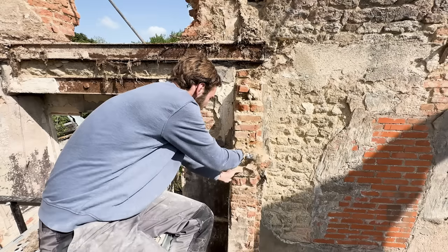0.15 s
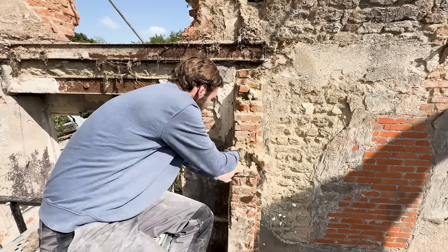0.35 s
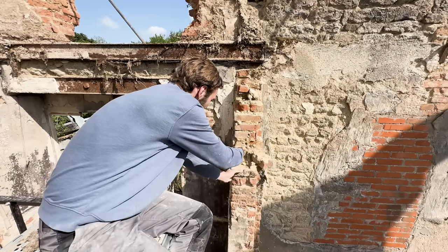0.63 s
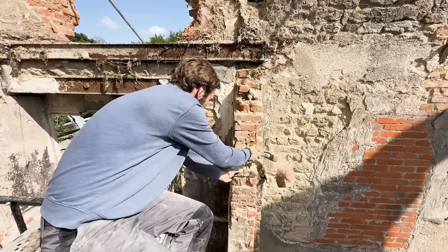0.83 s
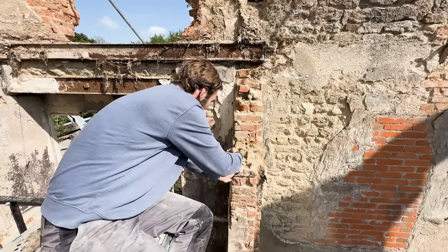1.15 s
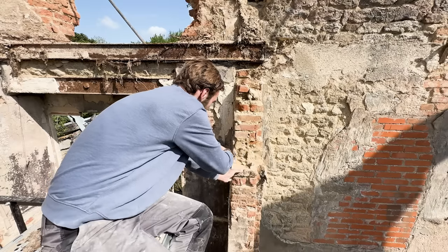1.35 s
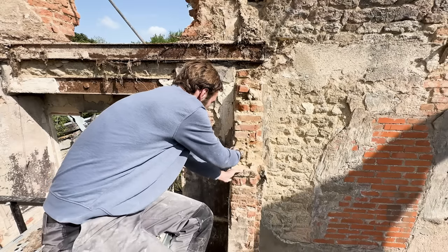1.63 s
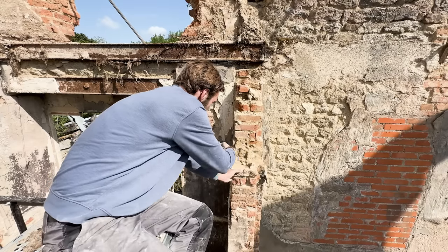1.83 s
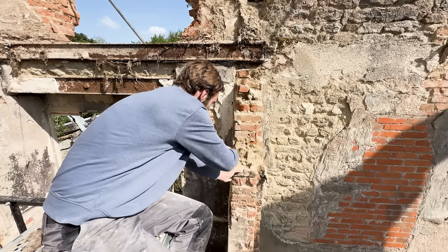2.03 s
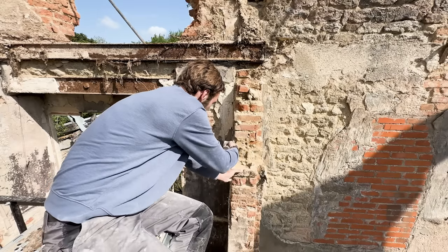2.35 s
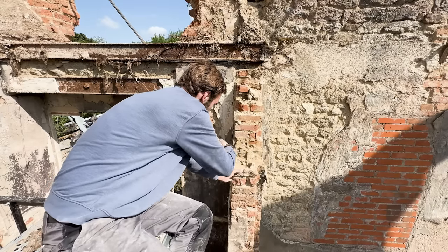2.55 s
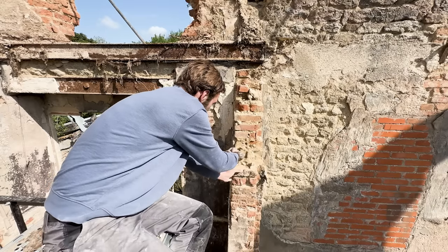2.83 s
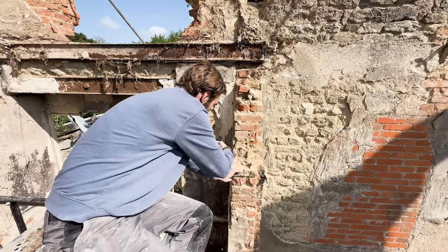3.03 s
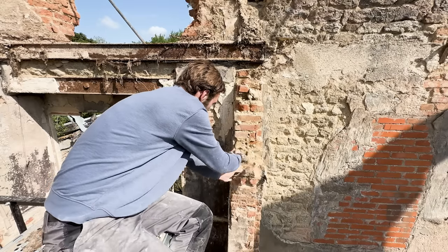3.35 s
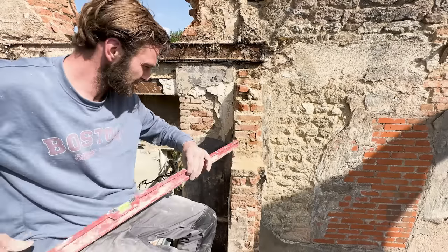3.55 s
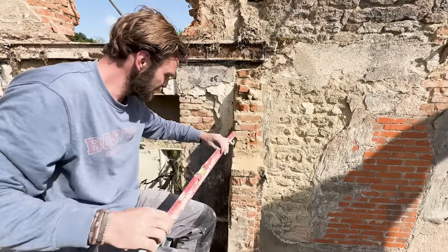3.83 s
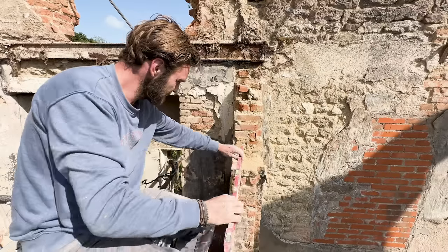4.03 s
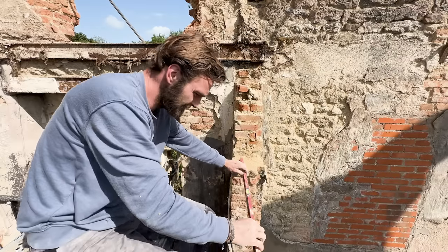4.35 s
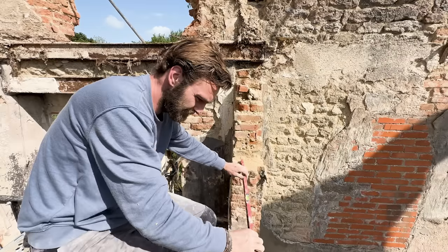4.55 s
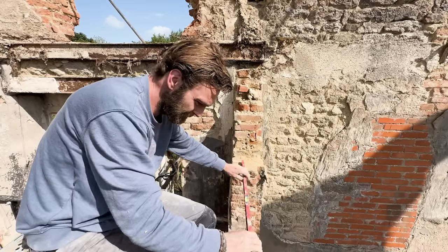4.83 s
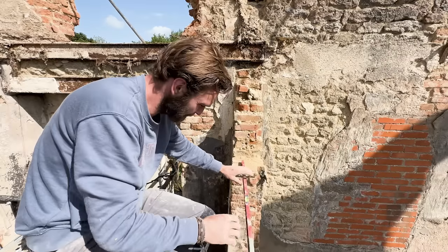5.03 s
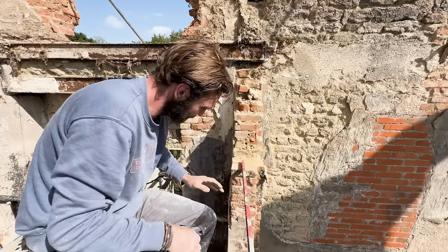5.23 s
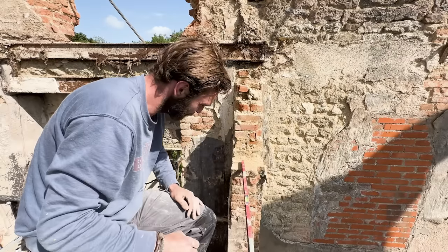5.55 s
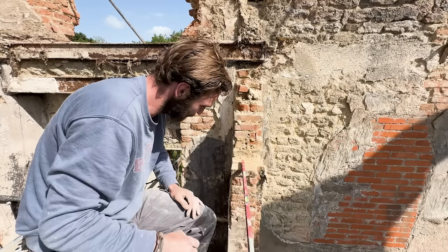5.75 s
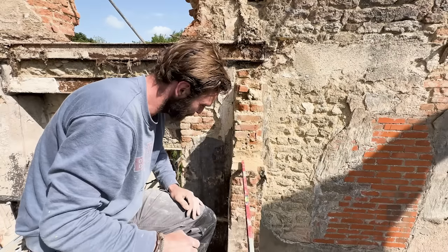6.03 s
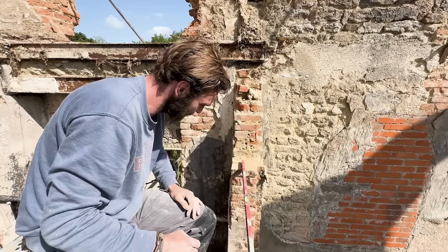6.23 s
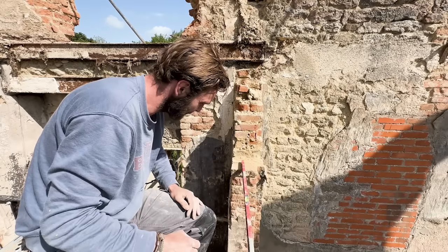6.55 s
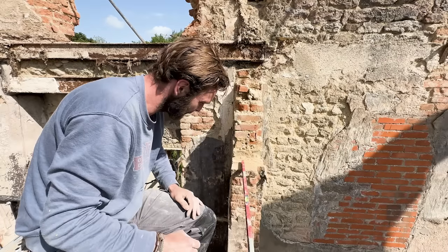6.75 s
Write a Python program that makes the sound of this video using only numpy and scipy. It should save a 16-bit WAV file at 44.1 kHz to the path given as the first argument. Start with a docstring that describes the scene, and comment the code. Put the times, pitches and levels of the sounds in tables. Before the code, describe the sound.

Loose brick and mortar crash down close by in an open ruin, thinning to small knocks, soft metallic scrapes, then near silence with distant birds.

```python
"""A quiet open ruin, heard through two microphone ports so close that the treble arrives in opposite phase.
At once, near by, masonry is knocked off an old wall: lumps boom on boards, bricks crumble, chips clatter
and grit trickles after, all made of shaped noise and resonances, with a short echo from the walls.
From about 3.5 s rubble shifts underfoot and a long metal tool, ringing modes shaken by rasps, is leaned
on the wall. After 6 s far birds whistle and coo in wavering sines; filtered noise is the air throughout."""
import sys
import numpy as np
from scipy import signal
from scipy.fft import rfft, irfft, next_fast_len
from scipy.io import wavfile
from scipy.ndimage import uniform_filter1d, map_coordinates

SR = 44100
rng = np.random.default_rng(int(sys.argv[2]) if len(sys.argv) > 2 else 0)


def waveform_to_disk(signal):
    """Save audio, clipped to [-1, 1], as 16-bit WAV at the path in sys.argv[1]."""
    frames = np.transpose(np.atleast_2d(signal))
    scaled = np.clip(frames, -1, 1) * 32767
    samples = np.round(scaled).astype(np.int16)
    wavfile.write(sys.argv[1], SR, samples)


N = 303830

# Far air at the ports. Each row: frequency in Hz, relative level in dB.
AIR_COLOUR = [(20, -30.5), (45, 3), (120, 2), (260, -9), (420, -14), (800, -22.5), (1500, -31.5),
              (2000, -26), (3000, -32), (5000, -36.5), (6200, -23), (8000, -44), (11000, -62.5),
              (16200, -57)]
AIR_DB = -63.5  # level before it is shared out over the ports
# How alike the far air is at the two ports. Each row: frequency in Hz, likeness from -1 to 1.
AIR_LIKENESS = [(60, -0.97), (300, 0.39), (700, -0.52), (3000, 0.56), (6800, 1), (15000, -1)]
# How alike the near sounds are at the two ports. Each row: frequency in Hz, likeness from -1 to 1.
NEAR_LIKENESS = [(60, 0.97), (180, 1), (350, 0.97), (600, 0.43), (1200, 0.736), (3000, 0.63), (6000, 0.67),
                 (9000, 0.74), (11000, 1), (14000, 1), (16000, .9)]
# Phase between the ports for near sounds. Each row: frequency in Hz, lead of the left in radians.
NEAR_LEAD = [(250, 0), (600, .6), (1200, .1), (4000, .3), (6000, -.6), (8000, -1.8), (10000, -2.5),
             (11000, -3.02), (13800, -3.3), (15300, -4.1)]
# Balance of the ports. Each row: frequency in Hz, left minus right in dB.
PORT_BALANCE = [(200, 0), (700, 3), (1300, .5), (2400, 2), (4400, 1), (8000, 0)]

# Showers of falling rubble. Each row: start in seconds, rise in seconds, fall in dB/s,
# then the peaks of lumps, chunks, chips and grit in dB; the shares below scale rise and fall.
SHOWERS = [(0.0, 0.00067, 170.5, -7.5, -22, -28, -30.5), (0.03, 0.039, 246.5, -42, -28, -27.5, -34.5),
           (0.17, 0.0048, 92, -30, -38, -36.5, -54), (0.386, 0.012, 122.5, -16.5, -21.5, -23, -38),
           (0.46, 0.038, 112.5, -19.5, -20.5, -28.5, -38.5),
           (0.704, 0.0052, 400.5, -27, -31.5, -28.5, -35.5), (0.762, 0.039, 103, -6.5, -14, -25, -50.5),
           (0.97, 0.11, 104, -27, -33, -37.5, -45), (1.3, 0.11, 28, -43.5, -54, -56, -59.5),
           (1.561, 0.0026, 158, -38, -40.5, -36, -47.5), (1.71, 0.089, 97.5, -46, -52, -52, -54),
           (1.82, 0.033, 140, -32.5, -28.5, -24, -46), (2.075, 0.03, 185, -39, -36.5, -39.5, -52),
           (2.125, 0.029, 349.5, -32.5, -33, -33, -46.5), (2.2, 0.018, 94.5, -33.5, -37, -36.5, -42.5),
           (2.33, 0.019, 157, -49, -46.5, -72, -50), (2.44, 0.1, 203, -54.5, -51.5, -54.5, -61),
           (2.734, 0.0028, 896, -30, -42.5, -33, -66.5), (2.745, 0.0097, 162, -42, -55, -75, -62),
           (2.826, 0.012, 185, -41, -36, -61, -75.5), (3.042, 0.013, 150.5, -50, -52, -88.5, -100),
           (3.293, 0.0024, 903, -35, -43.5, -41.5, -63), (3.3, 0.013, 209, -32.5, -58, -73, -102)]
# Loose rubble shifted underfoot, nothing trickling after. Each row: as for the showers.
SHUFFLES = [(3.48, 0.012, 148.6, -48.5, -56, -62, -50.5), (3.56, 0.113, 58.4, -62, -81, -69, -56),
            (3.715, 0.031, 130.4, -78, -49, -54.5, -45), (3.79, 0.018, 150, -66, -67, -71, -52.5),
            (3.86, 0.023, 93, -55, -60, -62, -55), (3.95, 0.086, 60.2, -86.5, -85, -76, -63.5),
            (4.31, 0.07, 40, -61, -65.5, -72, -68), (4.5, 0.04, 49.6, -58, -59.5, -64.5, -61.5),
            (4.72, 0.061, 130, -50, -60.5, -72, -62.5), (5.066, 0.0036, 123, -66.5, -65.5, -80, -94),
            (5.222, 0.022, 43, -67, -80, -81, -63.5), (5.28, 0.068, 200.3, -59, -59, -61, -53),
            (5.497, 0.0083, 102.6, -58.5, -63, -79, -99)]
RISE_DB = 9.5  # a shower starts this far under its peak
# Share of the row's rise time. In order: lumps, chunks, chips, grit.
RISE_SHARE = [1, 0.69, 0.83, 1.05]
# Share of the row's fall rate. In order: lumps, chunks, chips, grit.
FALL_SHARE = [0.88, 0.92, 1, 1]
# Stragglers after a shower, in dB relative to its peak. In order: lumps, chunks, chips, grit.
TRICKLE_DB = [-28, -24, -27, -15.5]
# Fall of the stragglers, in dB/s. In order: lumps, chunks, chips, grit.
TRICKLE_FALL = [43, 31, 37, 11]
# Resonances of the boards. Each row: frequency in Hz, width in Hz, relative level in dB.
BOARDS = [(47.8, 60, -14), (64.5, 9.9, 0.5), (109, 35, -4.5), (150.5, 41, -2.5), (205, 64, -5),
          (296, 74, -7)]
# Colour of knocking chunks. Each row: frequency in Hz, relative level in dB.
CHUNK_COLOUR = [(130, -39), (260, -2), (350, -1), (520, -2.5), (750, -9.5), (1100, -28), (2200, -41.5),
                (5000, -100)]
# Colour of clattering chips. Each row: frequency in Hz, relative level in dB.
CHIP_COLOUR = [(350, -35), (650, 1), (950, -2.5), (1500, -6), (2300, -10), (3500, -18.5), (6000, -47),
               (12000, -90.5)]
# Colour of hissing grit and of cracks. Each row: frequency in Hz, relative level in dB.
GRIT_COLOUR = [(1290, -14.5), (2200, -8), (3020, -9), (3980, -9.5), (5030, -10.5), (9030, -12),
               (10700, -14.5), (14700, -21), (16200, -17.5)]
# Scatter of colour among the pieces. Each row: frequency in Hz, depth in dB.
PIECE_SCATTER = [(400, 3), (2000, 3.5), (8000, 3)]

# Pieces heavy enough to thump the boards. Each row: time in seconds, crack in dB, thump in dB,
# thump in Hz, knock in dB, knock in Hz; levels are relative within each kind.
HITS = [(0.0014, -31, -1, 80.3, -36.5, 604), (0.1835, -33, -21, 100.7, -24.5, 815),
        (0.389, -25.5, -8.5, 98.6, -15, 351.9), (0.446, -45, -6.5, 112, -28.5, 299.7),
        (0.4807, -27, -12, 144.8, -13, 329.6), (0.7051, -13.5, -29.5, 165.2, -43, 437.8),
        (0.715, -23, -27.5, 167, -34.5, 480), (0.7658, -31, -3.5, 135.2, -7.5, 367.2),
        (0.7973, -30.5, -4, 73.55, -16.5, 331.6), (0.878, -51, -8.5, 172.7, -22.5, 344.2),
        (0.928, -49, -17.5, 85, -30.5, 297), (1.563, -23, -41, 147, -28.5, 577),
        (1.579, -47, -29.5, 90.6, -56, 450), (1.8357, -28, -28.5, 93.45, -35.5, 1790),
        (1.8466, -36.5, -32.5, 132, -12, 1000), (2.1005, -37.5, -16.5, 198.5, -30.5, 478),
        (2.15, -22.5, -22, 165, -28.5, 820), (2.208, -34.5, -26, 130.6, -39.5, 690),
        (2.3399, -33, -25.5, 108.3, -37.5, 481), (2.376, -50.5, -29.5, 79, -45, 450),
        (2.462, -34.5, -32.5, 76, -56.5, 562), (2.7353, -25.5, -34, 199, -23.5, 1260),
        (2.744, -48.5, -27, 91.8, -47, 455), (2.9527, -38, -36.5, 78.9, -68, 440),
        (2.9895, -35.5, -37, 59.2, -44, 1560), (3.295, -23.5, -24.5, 225, -32.5, 1370),
        (3.306, -46.5, -26, 84.9, -42.5, 450), (3.3604, -38.5, -30, 88.6, -73, 431),
        (3.742, -47.5, -45, 192, -43, 565), (3.8837, -42.5, -34, 210, -41.5, 444),
        (4.58, -38, -37, 245, -48.5, 590), (4.794, -40.5, -35.5, 134.7, -47, 578),
        (5.587, -75, -56, 90.2, -61, 303)]
# Light taps of chips and tool on brick. Each row: time in seconds, crack in dB, knock in dB, knock in Hz;
# levels are relative within each kind.
TAPS = [(0.3915, -30, -24, 1480), (1.217, -30.5, -37, 990), (1.3752, -49.5, -39.5, 2350),
        (2.113, -44, -20.5, 473), (2.1354, -27.5, -27, 450), (2.4999, -58, -35, 556),
        (2.7635, -32, -50, 452), (2.841, -65, -39, 554), (3.068, -65, -43.5, 520),
        (3.1533, -45.5, -54, 490), (3.4873, -47, -45, 1764), (3.556, -62.5, -52, 4800),
        (3.581, -63, -46, 8400), (3.594, -47, -55, 8000), (3.675, -34, -43.5, 1700),
        (3.7172, -47, -41, 1800), (3.7223, -36, -36.5, 3700), (3.728, -36, -40, 3340),
        (3.7353, -40, -48, 1500), (3.8115, -35, -43, 2800), (3.8669, -49.5, -40, 1500),
        (3.870, -50, -39, 1970), (3.9625, -40.5, -50.5, 1770), (4.044, -42, -64, 1930),
        (4.117, -44.5, -73, 2274), (4.373, -42.5, -65.5, 550), (4.4053, -70, -57, 857),
        (4.431, -64.5, -51, 1240), (4.518, -48.5, -53.5, 1120), (4.732, -40.5, -77, 456),
        (4.773, -54, -56, 1750), (5.067, -70.5, -57, 545), (5.227, -55, -60.5, 2490),
        (5.3213, -38.5, -50.5, 643), (5.432, -44, -61, 2500), (5.526, -70.5, -53, 600),
        (6.7664, -58, -67, 1693)]
TAP_THUMP_DB, TAP_THUMP_HZ = -14.5, 141.7  # the boards' answer, set relative to the tap's knock entry

# Echo of the standing walls. Each row: frequency in Hz, time to fall 60 dB in seconds.
WALLS = [(100, 0.09), (1000, 0.19), (10000, 0.11)]

# Brick and mortar crumbling. Each row: start in seconds, rise in seconds, fall in dB/s,
# peak in dB, centre in Hz.
SHATTERS = [(0.386, 0.02, 59, -31.5, 1510), (1.812, 0.03, 116.5, -21, 1178), (1.82, 0.045, 198, -26.5, 530),
            (2.07, 0.048, 217.5, -28.5, 526), (3.733, 0.008, 300, -42, 567),
            (3.734, 0.0095, 600, -46.5, 1511), (5.492, 0.0093, 126, -62.5, 781)]

# Resonances of the long metal tool. Each row: frequency in Hz, width in Hz, relative level in dB.
TOOL_MODES = [(268.4, 51, 11.5), (672, 17, 5), (836, 22, 6.5), (924, 21, 8), (1540, 50, 3), (1815, 40, -1),
              (2480, 45, 4), (3070, 80, 5), (3590, 90, -1), (4840, 80, -1), (6150, 200, -3),
              (8700, 450, 3.5), (10500, 300, 2)]
# The tool drags on brick. Each row: start in seconds, stop in seconds, level in dB,
# centre of the rasp in Hz, its sharpness Q.
DRAGS = [(3.462, 3.486, -39, 4300, .35), (3.515, 3.54, -59, 3050, 4), (4.335, 4.4, -68, 930, 8),
         (4.4, 4.445, -63, 840, 8), (4.445, 4.535, -71, 930, 6), (4.54, 4.585, -63, 930, 6),
         (4.58, 4.71, -67, 675, 7), (4.5, 4.63, -74, 1815, 8), (4.578, 4.658, -58, 260, 1),
         (4.715, 4.79, -56.5, 277, 2), (4.76, 4.81, -63, 930, 6), (5.323, 5.356, -53.5, 2465, .5)]

# Small far birds. Each row: start in seconds, length in seconds, pitch in Hz, glide in Hz/s,
# level in dB before fade, flicker and balance.
CHIRPS = [(6.09, 0.32, 4070, -100, -68), (6.57, .11, 7450, 300, -85), (6.775, 0.1, 7780, 1200, -87)]
CHIRP_ATTACK_S, CHIRP_FADE_DB_PER_S, CHIRP_SCOOP_HZ = 0.03, 65, 200
COO_S, COO_LENGTH_S, COO_HZ, COO_LAST_HZ = 6.22, .21, 650, 530
COO_DB = -74.5  # before flicker and balance
COO_SWELL_DB, COO_HOLD_SHARE, COO_RELEASE_DB_PER_S = 5, .35, 320
TOP_HZ = 16100  # band limit


def amp(db):
    """Decibels to gain."""
    return 10 ** (np.asarray(db) / 20)


def unit(x):
    """Scaled to rms 1."""
    return x / np.sqrt(np.mean(x ** 2) + 1e-20)


def along(points, hz):
    """(Hz, value) points read on a log frequency axis."""
    f, v = np.transpose(points)
    return np.interp(np.log(hz + 1), np.log(f + 1), v)


def filtered(x, response):
    """x times a complex response of frequency."""
    m = next_fast_len(x.shape[-1] + SR // 2)
    spectrum = rfft(x, m) * response(np.fft.rfftfreq(m, 1 / SR))
    return irfft(spectrum, m)[..., :x.shape[-1]]


def patchy(pair, depth, window, bins, frames):
    """A random gain field over time and frequency, its depth in (Hz, dB) points."""
    hz, _, z = signal.stft(pair, SR, nperseg=window)
    field = uniform_filter1d(rng.standard_normal(z.shape[1:]), bins, 0)
    field = uniform_filter1d(field, frames, 1)
    gain = amp(along(depth, hz)[:, None] * unit(field))
    gain = gain / np.sqrt(np.mean(gain ** 2, 1, keepdims=True))
    return signal.istft(z * gain, SR, nperseg=window)[1][:, :N]


def ports(pair, alike, lead):
    """Two unrelated signals shared out over the microphone ports with the given likeness and phase lead."""
    def shares(hz):
        turn = np.arccos(np.clip(along(alike, hz), -1, 1)) / 2
        return np.array([np.cos(turn), np.sin(turn)])

    def left_and_right(hz):
        half = amp(along(PORT_BALANCE, hz) / 2) * np.exp(.5j * along(lead, hz))
        return np.array([half, 1 / half])

    common, opposed = filtered(pair, shares)
    return filtered(np.array([common + opposed, common - opposed]), left_and_right)


def air():
    """Far countryside hum and hiss: noise in uneven patches, deepest in the bass."""
    noise = rng.standard_normal((2, N))
    pair = patchy(noise, [(100, 4), (600, 3), (3000, 2)], window=2048, bins=3, frames=3)
    pair = unit(filtered(pair, lambda hz: amp(along(AIR_COLOUR, hz))))
    return amp(AIR_DB) * ports(pair, AIR_LIKENESS, [(60, 0)])


def contacts(db, rate, scatter_db, smooth):
    """Many small contacts of uneven size, rate per second, over a share of smooth noise."""
    n = len(db)
    struck = rng.random(n) < rate / SR
    grains = struck * amp(scatter_db * rng.standard_normal(n)) * rng.standard_normal((2, n))
    return amp(db) * unit(unit(grains) + smooth * rng.standard_normal((2, n)))


def resonant(pair, modes, contact):
    """Through a sum of resonances, of which the contact excites only a part; total energy 1."""
    def response(f):
        h = sum((-1) ** k * amp(db) * 1j * f * width / (centre ** 2 - f * f + 1j * f * width)
                for k, (centre, width, db) in enumerate(modes))
        excited = h * contact(f)
        return unit(np.abs(excited)) * np.exp(1j * np.angle(excited))
    return filtered(pair, response)


def coloured(pair, spectrum, size=8192):
    """Through a causal impulse response of energy 1 with this colour."""
    gain = amp(along(spectrum, np.fft.rfftfreq(size, 1 / SR)))
    # folding the cepstrum forward gives minimum phase: no sound before its cause
    cepstrum = irfft(np.log(gain + 1e-6))
    cepstrum[1:size // 2] *= 2
    cepstrum[size // 2 + 1:] = 0
    h = irfft(np.exp(rfft(cepstrum)))
    return signal.fftconvolve(pair, h[None] / np.linalg.norm(h), axes=1)[:, :N]


def loose_levels(size=16):
    """Level in dB of lumps, chunks, chips and grit: showers rise and fall, then stragglers trickle."""
    rate = SR / size
    column = lambda v: np.array(v)[:, None]
    power = np.full((4, N // size + 1), 1e-12)
    for rows, trickles in ((SHOWERS, True), (SHUFFLES, False)):
        for s, rise, fall, *peak_db in rows:
            at = round(s * rate)
            rise_s = rise * column(RISE_SHARE)
            after = np.arange(power.shape[1] - at) / rate - rise_s  # seconds since the peak
            late = np.clip(after, 0, None)
            rising_db = column(peak_db) + RISE_DB * np.clip(after, None, 0) / rise_s
            # twice the dB turns gain into power
            tail = amp(-2 * fall * column(FALL_SHARE) * late)
            stragglers = amp(2 * (column(TRICKLE_DB) - column(TRICKLE_FALL) * late))
            power[:, at:] += amp(2 * rising_db) * (tail + trickles * stragglers)
    return np.repeat(10 * np.log10(power), size, axis=1)[:, :N]


def rubble():
    """Lumps boom on the boards, chunks knock, chips clatter and grit hisses, all as dense small contacts."""
    lumps_db, chunks_db, chips_db, grit_db = loose_levels()
    soft = lambda hz: 1 / (1 + 1j * hz / 350) ** 3  # heavy lumps land softly

    def pieces(db, rate):
        # every piece rings at its own pitches for a moment, so the colour of the shower keeps changing
        steady = contacts(0 * db, rate, scatter_db=4, smooth=1.0)
        return patchy(steady, PIECE_SCATTER, window=512, bins=2, frames=3) * amp(db)

    lumps = resonant(contacts(lumps_db, rate=100, scatter_db=1.5, smooth=2.0), BOARDS, soft)
    chunks = coloured(pieces(chunks_db, rate=220), CHUNK_COLOUR)
    chips = coloured(pieces(chips_db, rate=700), CHIP_COLOUR)
    grit = coloured(pieces(grit_db, rate=5500), GRIT_COLOUR)
    return lumps + chunks + chips + grit


def impacts():
    """Each impact: a crack, a hollow knock at the piece's own pitch and a thump that swells in the boards."""
    cracks, out = np.zeros((2, N + SR)), np.zeros((2, N + SR))
    t = np.arange(SR // 5) / SR
    taps = [(s, crack_db, knock_db + TAP_THUMP_DB, TAP_THUMP_HZ, knock_db, hz)
            for s, crack_db, knock_db, hz in TAPS]
    for s, crack_db, thump_db, thump_hz, knock_db, knock_hz in HITS + taps:
        at = slice(round(s * SR), round(s * SR) + len(t))
        noise = rng.standard_normal((3, 2, len(t)))
        cracks[:, at] += amp(crack_db - 60 * t / 0.018) * (1 - np.exp(-t / 0.0032)) * noise[0]
        # the blow and its crumbling excite a broad resonance; small bright pieces settle sooner
        push = amp(-60 * t / (0.03 + 18 / knock_hz)) * noise[1]
        push[0, :round(SR / knock_hz / 3)] += 2.6  # the blow lasts a third of a cycle
        knock = signal.lfilter(*signal.iirpeak(knock_hz, 2.8, SR), push)
        out[:, at] += amp(knock_db + 5.0) * knock / np.abs(knock).max()
        # a rough piece wavers in pitch; its thump falls 60 dB in 16 cycles
        waver = 0.016 * np.cumsum(noise[2, 0])
        swell = (1 - np.exp(-t / 0.0046)) ** 2 * amp(-60 * t * thump_hz / 16)
        out[0, at] += amp(thump_db + 1.0) * swell * np.sin(2 * np.pi * thump_hz * t + waver)
    return out[:, :N] + coloured(cracks[:, :N], GRIT_COLOUR)


def ruin(pair):
    """The standing walls answer with a noise tail; each frequency dies at its own speed."""
    hz, t, z = signal.stft(rng.standard_normal((2, SR // 2)), SR, nperseg=256)
    fade = amp(-60 * t / along(WALLS, hz)[:, None])
    tail = signal.istft(z * fade, SR, nperseg=256)[1]
    delayed = np.pad(pair, ((0, 0), (500, 0)))  # 500 samples, about 11 ms
    return signal.fftconvolve(delayed, tail / np.linalg.norm(tail[0]), axes=1)[:, :N]


def shatter():
    """A breaking brick: a dense crunch of contacts around one pitch that swells and falls."""
    t, out = np.arange(SR // 2) / SR, np.zeros((2, N))
    for start, rise, fall, db, centre_hz in SHATTERS:
        crunch_db = db - 22 * np.clip(1 - t / rise, 0, 1) - fall * np.clip(t - rise, 0, None)
        band = [(centre_hz, 0.49 * centre_hz, 0)]
        dull = lambda hz: 1 / (1 + 1j * hz / (0.87 * centre_hz))
        at = round(start * SR)
        crunch = contacts(crunch_db, rate=2100, scatter_db=3.5, smooth=0.38)
        out[:, at:at + len(t)] += resonant(crunch, band, dull)
    return out


def tool():
    """Each drag on brick shakes those resonances of the metal that lie near its rasp."""
    t, out = np.arange(SR // 2) / SR, np.zeros((2, N))
    for start, stop, db, rasp_hz, q in DRAGS:
        length = stop - start
        onset_db = -20 * np.clip(1 - t / (0.08 * length), 0, 1)
        release_db = -60 * np.clip(t - length, 0, None) / 0.008
        drag = contacts(db + onset_db + release_db, rate=2800, scatter_db=4.5, smooth=1.2)

        def rasp(hz):
            ratio = hz / rasp_hz
            return (1j * ratio / (q + 1j * ratio - q * ratio ** 2)) ** 2

        at = round(start * SR)
        out[:, at:at + len(t)] += resonant(drag, TOOL_MODES, rasp)
    return out


def flicker(rate, depth_db):
    """Moving air makes a far tone waver in strength and pitch: a smooth random gain, rate knots per second."""
    knots = rng.standard_normal(int(N * rate / SR) + 4)
    return amp(depth_db * map_coordinates(knots, [np.arange(N) * rate / SR]))


def chirps():
    """Thin far whistles: sines that drop onto their pitch, glide and fade."""
    t, whistles = np.arange(N) / SR, 0
    for s, length, hz, glide, db in CHIRPS:
        since = np.clip(t - s, 0, None)
        attack = np.clip((t - s) / CHIRP_ATTACK_S, 0, 1)
        pitch = hz + glide * np.clip(t - s, 0, length) + CHIRP_SCOOP_HZ * (1 - attack)
        release_db = 600 * np.clip(t - s - length, 0, None)
        shape = attack * amp(db - CHIRP_FADE_DB_PER_S * since - release_db)
        waver = flicker(150, depth_db=.06)
        whistles = whistles + shape * np.sin(2 * np.pi * np.cumsum(pitch * waver) / SR)
    return whistles * flicker(63, depth_db=2.5) * amp([[1.5], [-1.5]])  # a little to the left


def coo():
    """A soft far coo: a sine that holds, then sinks, with a tone at half its pitch swelling under it."""
    t = np.arange(N) / SR
    u = (t - COO_S) / COO_LENGTH_S  # 0 to 1 through the coo
    sink = np.clip((u - COO_HOLD_SHARE) / (1 - COO_HOLD_SHARE), 0, 1.2)
    pitch = COO_HZ + (COO_LAST_HZ - COO_HZ) * sink
    swell_db = COO_SWELL_DB * np.clip(1 - u, 0, 1)
    release_db = COO_RELEASE_DB_PER_S * np.clip(t - COO_S - COO_LENGTH_S, 0, None)
    shape = np.clip((t - COO_S) / 0.013, 0, 1) * amp(COO_DB - swell_db - release_db)
    half_phase = np.pi * np.cumsum(pitch * flicker(60, depth_db=.15)) / SR
    tone = flicker(45, depth_db=3.5) * np.sin(2 * half_phase)
    under = amp(4) * np.clip(u + .3, 0, 1) * flicker(30, depth_db=4) * np.sin(half_phase)
    return shape * (tone + under) * amp([[2.5], [-2.5]])  # further to the left


def scene():
    """Near masonry and tool with their echoes at the two ports, over far birds and air."""
    far_air = air()
    near = rubble() + impacts() + shatter() + tool()
    # echoes are added to each of the two unrelated parts, so they pass the ports like the direct sound
    with_echo = near + amp(-13.5) * ruin(near)
    return ports(with_echo, NEAR_LIKENESS, NEAR_LEAD) + chirps() + coo() + far_air


def record(dry):
    """Loud peaks are rounded off, and nothing is kept above the band limit."""
    soft = dry / (1 + np.abs(dry / .95) ** 6) ** (1 / 6)
    return filtered(soft, lambda hz: hz < TOP_HZ)


dry = scene()
out = record(dry)
waveform_to_disk(out)
```